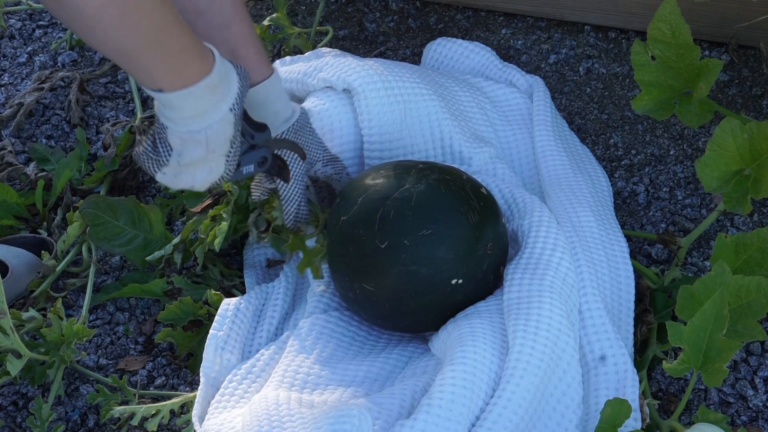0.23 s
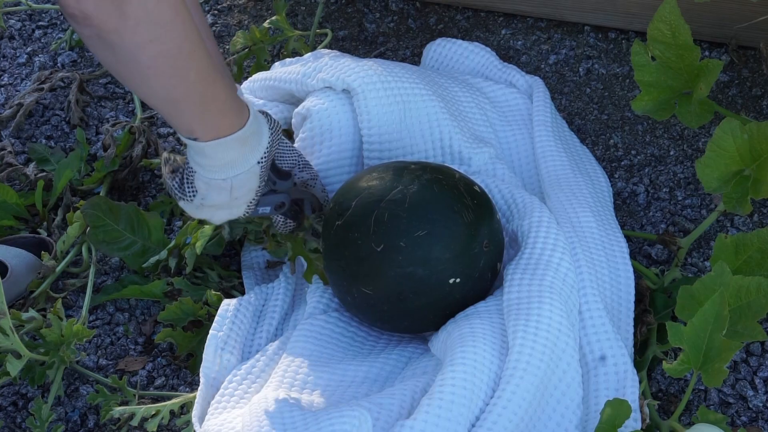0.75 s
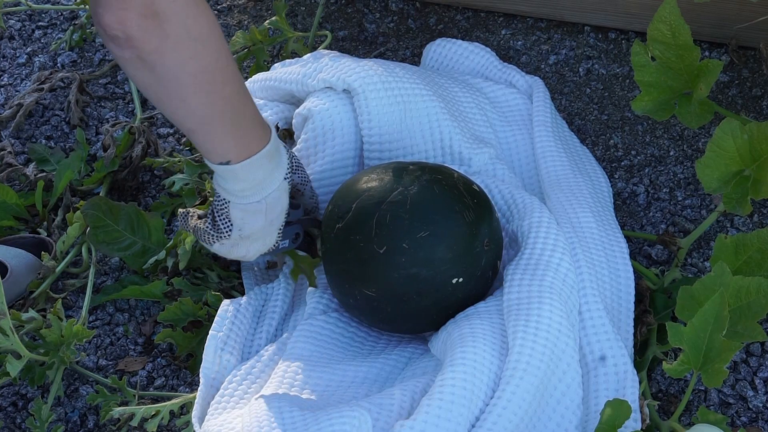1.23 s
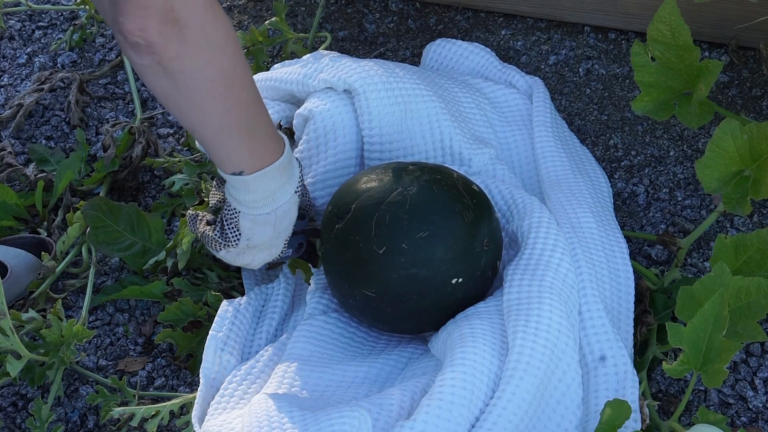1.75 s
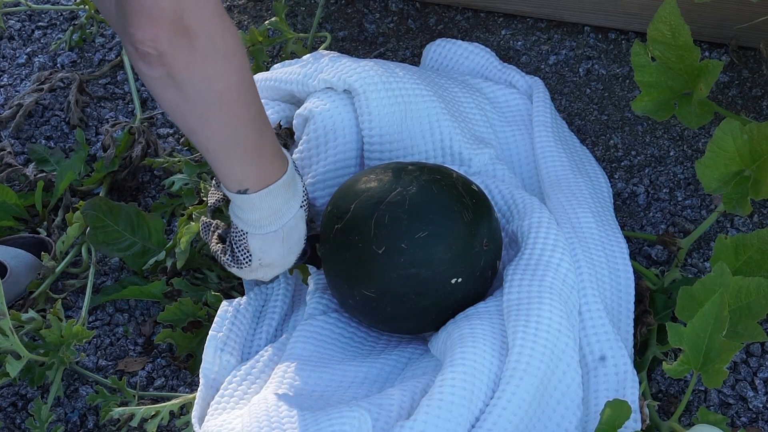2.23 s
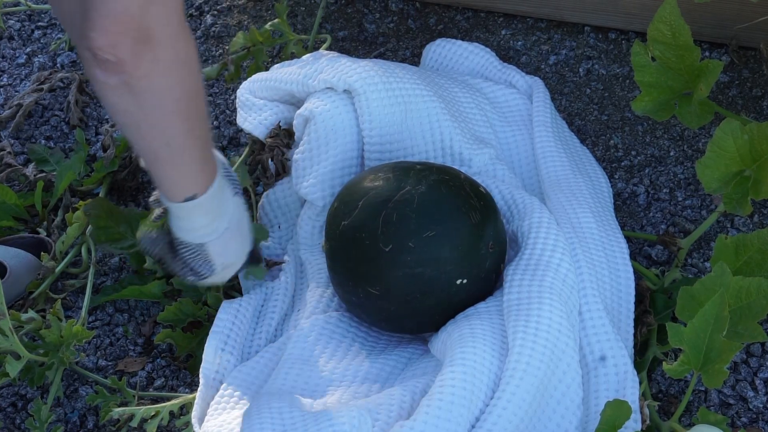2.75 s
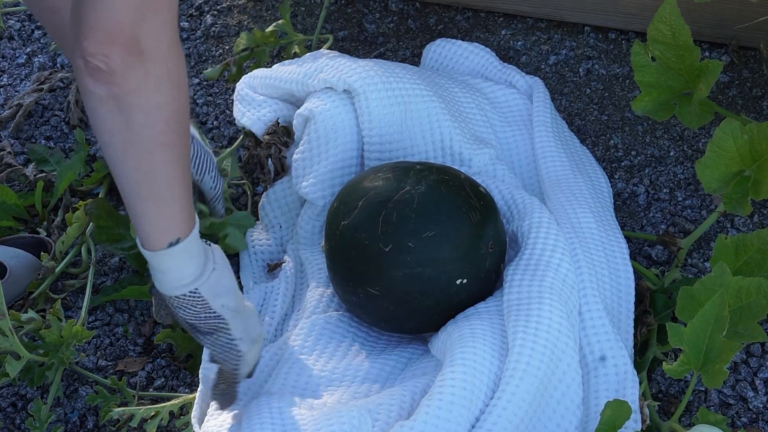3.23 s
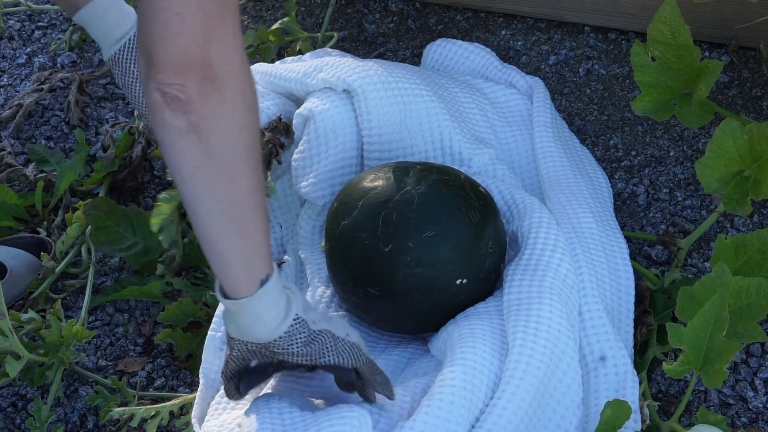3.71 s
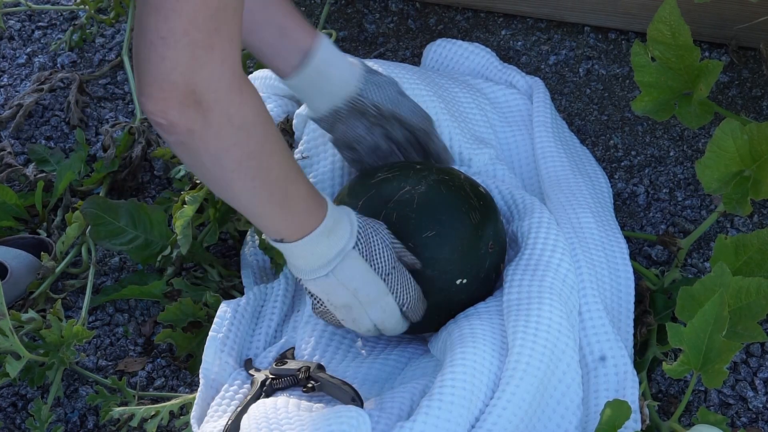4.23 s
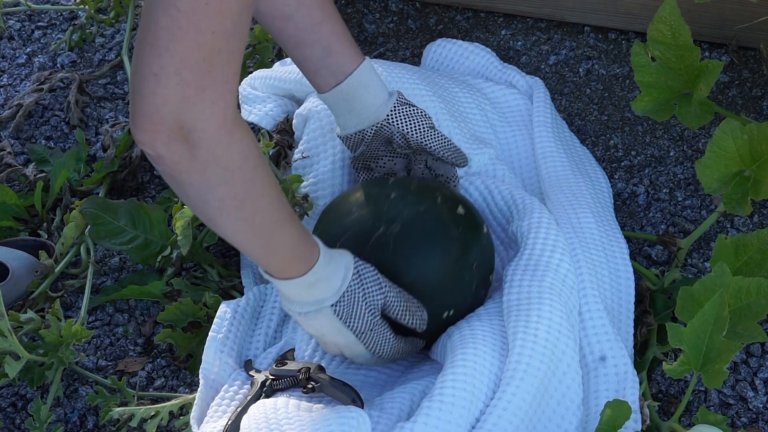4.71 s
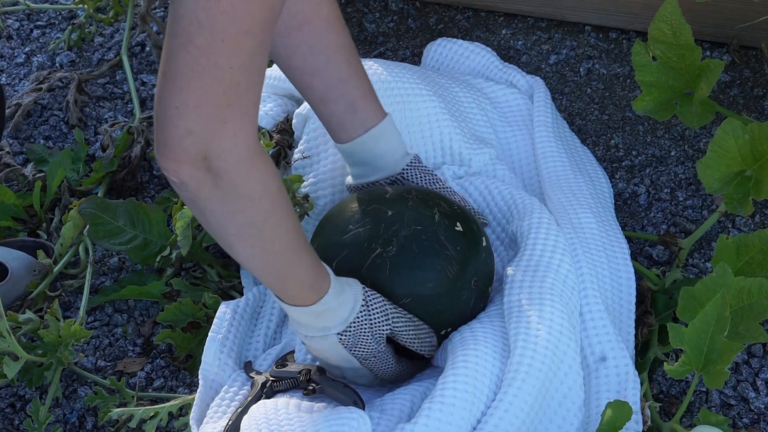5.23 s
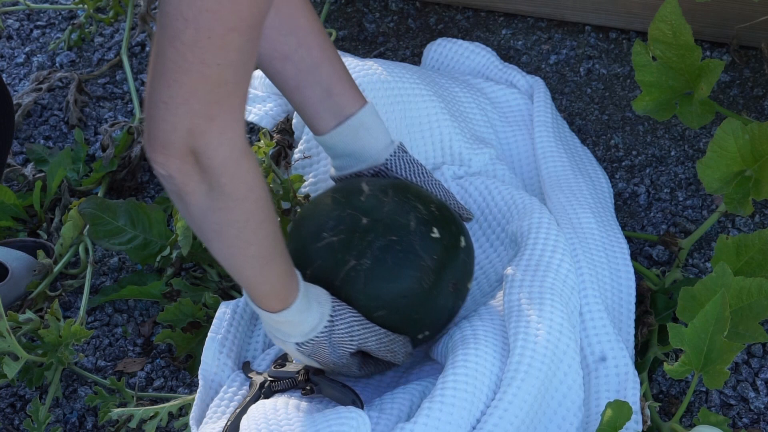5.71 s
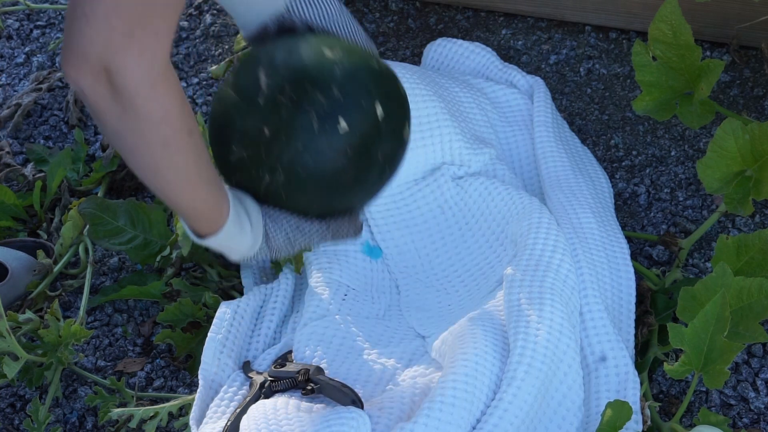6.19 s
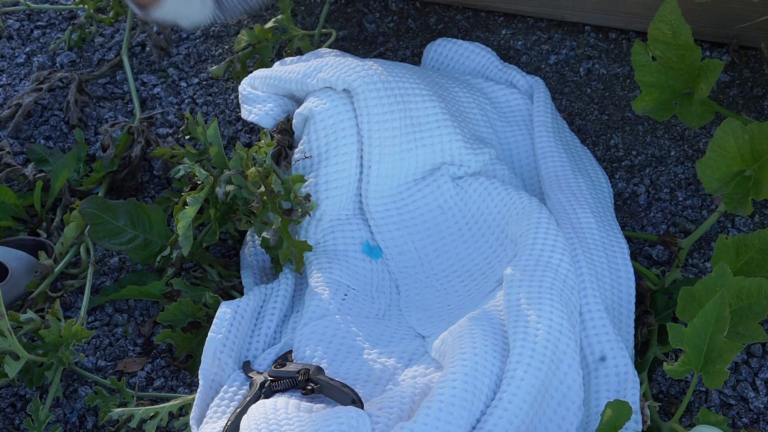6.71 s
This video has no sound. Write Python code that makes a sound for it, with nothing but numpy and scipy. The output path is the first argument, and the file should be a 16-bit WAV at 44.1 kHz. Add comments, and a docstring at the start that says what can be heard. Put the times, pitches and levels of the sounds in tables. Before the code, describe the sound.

A quiet open-air garden heard close up in stereo, with soft uneven hiss and a faint, narrow cricket whistle far away. From 0 to 1 s gloved hands rustle dry vine leaves, with many crisp snaps, strongest around 0.5 to 0.9 s, and faint dull knocks near 0.3 to 0.4 s. A katydid close by rasps in fast high pulses, about fourteen a second, from 0.1 to 1.1 s, 1.5 to 2.5 s, then from 3 s to the end. Rustling thins until about 2.5 s, when blades crunch through a stem in a brief, dense, splitting crackle. Leaves and cloth rustle again to 3.7 s; shears clack sharply at about 3.55 s and lightly at 3.9 s. A scuffing glove slap lands on the melon at 4.7 s, with duller pats at 5.2 and 5.4 s. Handling then fades to sparse crackles, leaving insects and air.

```python
"""A summer garden heard on a small two-port microphone: outdoor hiss in drifting patches, crickets far off
as a narrow noise whistle, and from the start gloved hands rustling dry vine leaves, in coloured snaps.
A katydid soon rasps close by on the left, ticks ringing its wing; stalks snap and a few dull knocks follow.
At about 2.5 s blades crunch through a stem, a dense crackle with ringing splits; then the shears clack,
and from about 4.7 s gloves slap a melon, whose rind rings in decaying modes under a scuff of noise."""
import sys
import numpy as np
from scipy import signal
from scipy.io import wavfile
from scipy.ndimage import uniform_filter1d

SR = 44100
rng = np.random.default_rng(int(sys.argv[2]) if len(sys.argv) > 2 else 0)


def to_wav(sig):
    """Store sig (one row per channel, or 1-D mono) as 16-bit WAV at the path in sys.argv[1].

    Samples outside -1..1 are clipped; the rate is SR.
    """
    pcm = np.clip(np.atleast_2d(sig), -1, 1) * 32767
    pcm = np.round(pcm).astype(np.int16)
    wavfile.write(sys.argv[1], SR, pcm.T)  # frames by channels


N = 306627  # samples


def amp(db):
    """Turns dB into an amplitude factor."""
    return 10 ** (np.asarray(db) / 20)


def evened(x):
    """Scales a signal to rms 1."""
    return x / np.sqrt(np.mean(x ** 2) + 1e-20)


def read(points, hz):
    """Reads a spectrum table on a log-frequency axis."""
    f, value = np.transpose(points)
    return np.interp(np.log(hz + 1), np.log(f + 1), value)


def follow(rows, t, column=1):
    """Reads a table column at times t, in straight lines between rows."""
    return np.interp(t, np.transpose(rows)[0], np.transpose(rows)[column])


def add(mix, s, sound):
    """Lays a sound into the mix at s seconds, cut off at the end."""
    part = mix[..., round(s * SR):][..., :sound.shape[-1]]
    part += sound[..., :part.shape[-1]]


def wander(size, count=N):
    """Slow chance of rms 1: noise averaged over size samples."""
    return evened(uniform_filter1d(rng.standard_normal(count), size))


def ring(x, hz, width):
    """One resonance of gain about 1 at its centre, width in Hz."""
    r = np.exp(-np.pi * width / SR)
    return 2 * signal.lfilter([1 - r], [1, -r * np.exp(2j * np.pi * hz / SR)], x).real


def colour(x, points):
    """Causal filter with the given dB spectrum (minimum phase)."""
    level = np.log(amp(read(points, abs(np.fft.fftfreq(2048, 1 / SR)))))
    spectrum = np.exp(level - 1j * signal.hilbert(level).imag)
    taps = np.fft.ifft(spectrum).real[:800]
    return signal.oaconvolve(x, taps[None], axes=1)[:, :x.shape[1]]


def ports(a, b, alike, lead=0):
    """Two ports share part of a sound; the left hears the shared part lead samples early."""
    alike = np.clip(alike, 0, 1)
    return np.array([np.roll(a, -lead), alike * a + np.sqrt(1 - alike ** 2) * b])


def pan(db):
    """Gains of the two ports for a left-right difference in dB."""
    return amp([[db / 2], [-db / 2]])


# Colour of the open air at the microphone. Each row: frequency in Hz, relative density in dB per Hz.
AIR_COLOUR = [(18, -58), (30, -22), (185, -28.5), (306, -20), (694, -11.5), (881, -7.5), (1120, -4),
              (1530, -6), (2160, -1.5), (2740, -2), (3660, 0), (8530, -8), (12300, -8.5), (15200, -19.5),
              (16500, -46)]
# How much of the air both ports share. Each row: frequency in Hz, likeness from 0 to 1.
AIR_LIKENESS = [(60, 0.14), (300, 0.4), (1200, 0.18), (2200, 0.049), (4000, 0.83), (9000, 0.48),
                (15000, .4)]
# Lean of the air between the ports. Each row: frequency in Hz, left-right difference in dB.
AIR_LEAN = [(60, 0), (180, 0), (550, 0), (1650, 3.5), (4970, 2), (15000, -5.5)]
# Swells of the low hiss. Each row: time in seconds, lift around 350 Hz in dB, lift around 900 Hz in dB.
LOW_SWELLS = [(0, 1.5, 1.5), (.7, 2, 2), (1.25, 7, 1), (1.6, 1.5, 1), (2.5, 1.5, 1.5), (3.3, 3, 2),
              (4.4, 1, 2), (5.3, 5, 3.5), (5.8, 0.5, 1.5), (6.4, 1.5, 1.5), (6.7, 4, 4), (6.95, 0, 8)]
AIR_DB = -46.5  # rms over both ports


def air():
    """Outdoor hiss: noise in drifting patches, reaching the left port first; its low part swells."""
    frames, hz = N // 256 + 5, np.fft.rfftfreq(1024, 1 / SR)
    a, b, c, d, patches = rng.standard_normal((frames, 513, 5)).T
    patches = uniform_filter1d(patches, size=12, axis=0)
    patches = evened(uniform_filter1d(patches, size=10, axis=1))

    alike = np.clip(read(AIR_LIKENESS, hz), 0, 1)[:, None]
    left, own_right = a + 1j * b, c + 1j * d
    late = np.exp(-2j * np.pi * hz * 3 / SR)[:, None]  # 3 samples
    z = np.array([left, alike * left * late + np.sqrt(1 - alike ** 2) * own_right])

    t, octave = np.arange(frames) * 256 / SR, np.log2(hz + 1)[:, None]
    swell_db = np.exp(-((octave - np.log2(350)) / 1.24) ** 2) * follow(LOW_SWELLS, t)
    swell_db += np.exp(-((octave - np.log2(900)) / 1.04) ** 2) * follow(LOW_SWELLS, t, column=2)
    z *= amp(read(AIR_COLOUR, hz)[:, None] + 1.2 * patches + swell_db)
    z *= amp(np.outer([.5, -.5], read(AIR_LEAN, hz)))[..., None]
    hiss = signal.istft(z, nperseg=1024, noverlap=768)[1][:, :N]
    return amp(AIR_DB) * evened(hiss)


# The far crickets' loudness at the microphone. Each row: time in seconds, level in dB.
CRICKET_LEVEL = [(0, -56), (.7, -54), (1.1, -59), (1.55, -55), (3.81, -54), (4.1, -60), (5.9, -58.5),
                 (6.5, -73), (6.95, -56)]


def crickets():
    """Many far crickets blur into one narrow, broken whistle: noise through two like resonances."""
    noise = rng.standard_normal((2, N))
    whistle = ring(ring(noise, 2199, 160), 2199, 160)
    whistle *= amp(2.0 * wander(size=1500))
    level = amp(follow(CRICKET_LEVEL, np.arange(N) / SR))
    return level * evened(whistle) * pan(3)


def crackle(points, per_s, spread_db, clump_db, t60, count=N):
    """Tiny snaps, each in its own pitch range and with a short rough tail, in clumps, a few large."""
    together, out = wander(size=250, count=count), np.zeros((2, count))
    t = np.arange(600) / SR
    for hz in np.geomspace(700, 14000, num=10):
        size = amp(spread_db * np.minimum(rng.exponential(1, (2, count)), 4))
        size *= rng.choice([-1., 1.], (2, count))
        tail = rng.standard_normal(len(t)) * amp(-60 * t / t60)
        tail[0] = 3.4  # the snap itself
        tail /= np.linalg.norm(tail)
        onsets = size * (rng.random((2, count)) < per_s / SR)
        snaps = signal.oaconvolve(onsets, tail[None], axes=1)[:, :count]
        a, b = snaps + 0.12 * rng.standard_normal((2, count))
        clumps = amp(clump_db * (together + 1.07 * wander(size=400, count=count)))
        out += ring(ring(ports(a, b, 0.68) * clumps, hz, 0.6 * hz), hz, 0.65 * hz)
    return evened(colour(out, points))


# Colour of dry leaves close to the microphone. Each row: frequency in Hz, relative filter gain in dB.
LEAF_COLOUR = [(180, -70), (300, -21.5), (900, -17), (1120, 0), (1410, -5.5), (2140, -3), (2700, -2.5),
               (5250, -4), (12300, -12), (16000, -22.5)]
# Hands moving through leaves and cloth. Each row: time in seconds, level in dB,
# brightness in dB per octave, pivoting at 5 kHz.
HAND_MOVES = [(0, -48.5, 5.5), (.14, -43.5, 1.5), (.21, -51.5, 9), (.3, -46, 2), (.45, -47.5, 3.5),
              (.56, -40.5, 2.5), (.63, -45, 7), (.74, -39.5, 4), (.84, -40, 2), (.96, -45.5, 3),
              (1.1, -50.5, 1), (1.2, -51, 0), (1.33, -45, 2.5), (1.41, -54, -0.5), (1.7, -51, 1),
              (2.2, -55, 1.5), (2.47, -51, -1.5), (2.56, -43, 3.5), (2.72, -43, 1), (2.87, -44, 2),
              (3.06, -49.5, -0.5), (3.25, -44.5, 2.5), (3.35, -48.5, 0.5), (3.5, -48.5, -0.5),
              (3.6, -43.5, 4), (3.84, -54, 0.5), (3.91, -48.5, 4), (4.05, -57, -3), (4.28, -51.5, 1.5),
              (4.37, -52, -1.5), (4.6, -45.5, -0.5), (4.85, -56, -1), (5.2, -52, 2.5), (5.5, -58.5, 2),
              (5.75, -59, 4), (6.1, -73, 6), (6.4, -57, 2), (6.95, -55, 4)]


def rustle():
    """Leaves and cloth under the hands: fine crackle, its colour tilted by brightness."""
    snaps = crackle(LEAF_COLOUR, per_s=200, spread_db=4.5, clump_db=2.0, t60=.011)
    hz, t, z = signal.stft(snaps, SR, nperseg=256)
    octaves = np.log2(np.maximum(hz, 400) / 5000)[:, None]
    z *= amp(follow(HAND_MOVES, t) + follow(HAND_MOVES, t, column=2) * octaves)
    return signal.istft(z, SR, nperseg=256)[1][:, :N]


def swarm(t60, grit_db, blow_db):
    """A blow just after the first touch, within a dying swarm of smaller breaks."""
    t = np.arange(3500) / SR
    decay = np.minimum(t / .001, 1) * amp(-60 * t / max(t60, .005))
    grit = np.tanh(wander(size=20, count=len(t)))
    a, b = rng.standard_normal((2, len(t))) * amp(grit_db * grit)
    out = ports(a, b, 0.52) * decay
    out *= np.sqrt(2) * np.linalg.norm(decay) / np.linalg.norm(out)
    out[:, 50] += amp(blow_db)
    return out


def hit(db, bass_db, treble_db, t60, pan_db, hz, ring_db, grit_db, blow_db):
    """A break of the given colour; the piece that gives way rings briefly."""
    drive = swarm(t60, grit_db, blow_db)
    shape = [(150, bass_db - 30), (500, bass_db - 10), (1300, bass_db), (2300, 0.51 * bass_db),
             (3300, 0.12 * bass_db), (6500, 0), (11000, treble_db), (16000, treble_db - 8.5)]
    ringing = ring(ring(drive, hz, 0.12 * hz), hz, 0.18 * hz)
    return amp(db) * (colour(drive, shape) + amp(ring_db) * ringing) * pan(pan_db)


# The loudest snaps of dry leaves and stalks. Each row: start in seconds, level in dB,
# bass at 1.3 kHz in dB, treble at 11 kHz in dB (both against 6.5 kHz), ring in Hz.
SNAPS = [(0.0279, -27, -21, 3, 6850), (0.0522, -25.5, -32, 1, 6000), (0.0974, -27.5, -5, -10, 4530),
         (.113, -26, -23, -1, 3690), (0.22, -29.5, -22, .5, 9000), (0.257, -27, -20, -2, 3250),
         (.3704, -24, -17, -1, 8760), (0.4103, -27, -27, -4, 7800), (.5013, -28, -28, -6, 7150),
         (.522, -20, -19, 0, 4940), (0.5393, -26, -22, -7, 3800), (0.5433, -26, -7, -5, 8700),
         (0.5619, -20, -30, -3, 7300), (0.5928, -29, -15, -4, 2230), (.627, -21.5, -30, -5, 9450),
         (0.692, -24, -14, -11, 7550), (0.7232, -26.5, -20, -2, 6400), (.7866, -29, -20, -13, 6900),
         (.818, -24, -27, -8, 8500), (.824, -26, -23, -16, 5060), (.8394, -29, -28, -17, 6400),
         (0.845, -25.5, -30, -5, 6860), (.894, -27.5, -24, -15, 5440), (.9378, -28, -23, -12, 8300),
         (.9524, -28, -19, -10, 2420), (1.1692, -33.5, -13, 5, 2270), (1.2316, -30, -20, -20, 3450),
         (1.254, -29, -10, -3, 2460), (1.275, -32, -3, -5, 3830), (1.5227, -31.5, -15, -5, 6770),
         (1.5858, -32.5, -24, 1, 3730), (2.2357, -32, -21, 0, 2080), (2.5631, -24.5, -5, 3.5, 9500),
         (2.6008, -36, 7, 4, 2200), (2.6468, -36, -14, 6, 9150), (2.6885, -23, -7.5, 1.5, 5700),
         (2.8185, -27.5, -17, -27, 3230), (2.886, -25, -25, 0, 4360), (2.939, -28, -20, -15, 4400),
         (3.043, -24, -12, -10, 1980), (3.1853, -21.5, -20, -30, 3950), (3.2241, -29, -15, -15, 3490),
         (3.2636, -32, -9, 6, 10700), (3.341, -32, -20, 4, 9000), (3.493, -29, -22, -23, 3320),
         (4.363, -29.5, 3.5, -30, 3050), (4.4057, -34, 0, -8, 2220), (4.491, -29.5, -30, -12, 4530),
         (4.529, -31, -16, -19, 3780), (4.5404, -31, -23, -6, 3760), (4.968, -34, 5, -23, 3990),
         (5.1805, -28.5, -13, -15, 1920), (5.2212, -31, -22, -12, 5800), (5.233, -30, -22, -14, 5150),
         (5.2758, -32, -1, -15, 3240), (5.623, -32.5, -18, -12, 4950), (6.4595, -30, -13, -1, 4230)]
SNAP_T60, SNAP_PAN_DB = 0.023, 0  # s, left-right dB
SNAP_RING_DB, RING_DB_PER_OCTAVE = 1.5, -3.5  # at 5 kHz; thick stalks ring lower and stronger


def cracks():
    """Dry leaves and stalks snap: short noise bursts, each with a ring of its own pitch."""
    out = np.zeros((2, N))
    for s, db, bass_db, treble_db, hz in SNAPS:
        ring_db = SNAP_RING_DB + RING_DB_PER_OCTAVE * np.log2(hz / 5000)
        add(out, s, hit(db, bass_db, treble_db, SNAP_T60, SNAP_PAN_DB, hz, ring_db, grit_db=3.0, blow_db=10))
    return out


# Two pulls and a slide back of the wings.
# Each row: peak in seconds, half width in seconds (to 1/e), relative level in dB.
WING_STROKE = [(.012, 0.0043, -4), (.03, .005, -3), (.046, 0.0047, -13.5)]
# Resonances of the wing. Each row: frequency in Hz, width in Hz, relative level in dB.
WING_MODES = [(10400, 150, -7), (10770, 160, -7.5), (11230, 250, -8), (11600, 86, 0.5), (11940, 160, -7.5),
              (12290, 165, 1.5), (12750, 130, 0), (13080, 400, -8), (14100, 500, -20)]
# Three phrases, drifting a little around 14 strokes a second. Each row: time in seconds, strokes done.
STROKE_COUNTS = [
    [(.062, 0), (.488, 6), (1.047, 14)],
    [(1.47, 0), (1.803, 5), (2.076, 9), (2.427, 14)],
    [(3.002, 0), (3.401, 6), (3.878, 13), (4.371, 20), (4.982, 29), (5.404, 35), (5.817, 41), (6.63, 53),
     (6.905, 57)],
]
# Effort of the katydid. Each row: time in seconds, drive in dB before the wing rings.
KATYDID_EFFORT = [(.06, -47.5), (.49, -47), (.66, -55), (1.05, -49), (1.47, -55), (1.67, -49),
                  (2.08, -45.5), (2.43, -50.5), (3.0, -54), (3.3, -47), (3.47, -50), (3.68, -45),
                  (4.27, -48.5), (4.55, -45), (5.2, -46), (5.65, -49.5), (5.85, -46.5), (6.4, -49),
                  (6.63, -44), (6.91, -47.5)]
# The wings stay in fading touch between the pulls.
CONTACT_DB, CONTACT_DB_PER_S, STROKE_S = -6.5, -100, .066


def katydid(teeth_hz=590, jitter=0.19, blur=0.46, sway_db=0.5):
    """Close by on the left, a scraper ticks over file teeth and rings the wing; foliage blurs it."""
    t, push = np.arange(0, STROKE_S, 1 / SR), np.zeros(N)
    pulls = sum(amp(db) * np.exp(-((t - s) / half) ** 2) for s, half, db in WING_STROKE)
    contact = amp(CONTACT_DB + CONTACT_DB_PER_S * t)
    shape = (pulls + contact) * signal.windows.tukey(len(t), .3)
    for phrase in STROKE_COUNTS:
        when, done = np.transpose(phrase)
        for s in np.interp(np.arange(done[-1] + 1), done, when):
            add(push, s, amp(follow(KATYDID_EFFORT, s) + 1.2 * rng.standard_normal()) * shape)

    teeth_passed = np.cumsum(teeth_hz * (1 + jitter * wander(size=300))) / SR
    at_tooth = np.diff(np.floor(teeth_passed), prepend=0) > 0
    ticks = evened(at_tooth * amp(1.7 * rng.standard_normal(N)))
    direct, scattered = ticks + blur * rng.standard_normal(N), rng.standard_normal(N)
    # half of the push, in dB, drives the wing and half shapes its sound
    drive = ports(evened(direct), scattered, 0.82, lead=3) * np.sqrt(push)

    wing = np.zeros((2, N))
    for k, (hz, width, db) in enumerate(WING_MODES):  # the wing angle favours now one mode, now another
        sway = amp(db + sway_db * wander(size=4000))
        wing += (-1) ** k * sway * ring(ring(drive, hz, width), hz, 900)
    return amp(15.5) * wing * np.sqrt(push) * pan(.6)


# Dull knocks carried to the microphone. Each row: start in seconds, level in dB, frequency in Hz.
KNOCKS = [(0.278, -60, 150), (.407, -56, 110), (.433, -61, 130)]


def bumps():
    """One slow push and rebound each: a cycle and a half of a sine under a smooth window."""
    out = np.zeros(N)
    for s, db, hz in KNOCKS:
        turns = np.arange(0, 1.5, hz / SR)
        add(out, s, amp(db) * np.sin(2 * np.pi * turns) * np.hanning(len(turns)))
    return out


# Colour of the stem under the blades. Each row: frequency in Hz, relative filter gain in dB.
STEM_COLOUR = [(200, -40), (600, -16), (1150, -12), (2000, -8), (3000, -0.5), (6000, -6), (9000, -9),
               (13000, -12), (16000, -16)]
# Blades bite, crunch through the stem, let go.
CUT_AT_S, CUT_DB, BITE_S, CRUNCH_S, BITE_DB, LET_GO_DB_PER_S = 2.49, -35, 0.024, 0.021, -6, -500


def cut():
    """Fibres part in a dense crunch that swells with the bite, holds, then falls away."""
    t = np.arange(SR // 8) / SR
    level_db = CUT_DB + BITE_DB * np.maximum(1 - t / BITE_S, 0)
    level_db += LET_GO_DB_PER_S * np.maximum(t - BITE_S - CRUNCH_S, 0)
    crunch = crackle(STEM_COLOUR, per_s=700, spread_db=1.5, clump_db=1.0, t60=0.0054, count=len(t))
    return crunch * amp(level_db)


# The stem splits under the blade. Each row: start in seconds, level in dB, ring in Hz, ring level in dB.
STEM_SPLITS = [(2.4915, -28, 2050, 12), (2.5017, -23, 3020, 2), (2.5065, -27.5, 2980, 10),
               (2.512, -28, 3190, 1), (2.5322, -28, 5850, -8)]
SPLIT_BASS_DB, SPLIT_TREBLE_DB, SPLIT_T60, SPLIT_PAN_DB = -8, -9, .04, -1.5  # T60 in s


def splits():
    """The stem splits: rough bursts a little to the right, each ringing at its own pitch."""
    out = np.zeros((2, N))
    for s, db, hz, ring_db in STEM_SPLITS:
        add(out, s, hit(db, SPLIT_BASS_DB, SPLIT_TREBLE_DB, SPLIT_T60, SPLIT_PAN_DB, hz, ring_db,
                        grit_db=8.0, blow_db=13))
    return out


# The shears clack. Each row: start in seconds, level in dB, treble at 11 kHz against 6.5 kHz in dB.
CLACKS = [(3.4027, -31, 2), (3.405, -28, 10), (3.5433, -37, 3), (3.5597, -17, 4), (3.583, -27.5, -4),
          (3.881, -28, -6), (3.9025, -41, -8)]
SHEARS_BASS_DB, SHEARS_T60, SHEARS_HZ, SHEARS_RING_DB = -27, 0.044, 11000, -4  # T60 in s


def shears():
    """The shears clack: thin, bright bursts with one high ring, midway between the ports."""
    out = np.zeros((2, N))
    for s, db, treble_db in CLACKS:
        add(out, s, hit(db, SHEARS_BASS_DB, treble_db, SHEARS_T60, 0, SHEARS_HZ, SHEARS_RING_DB,
                        grit_db=4.0, blow_db=7))
    return out


# Modes of the melon rind. Each row: frequency in Hz, relative level in dB, 60 dB decay in seconds.
RIND_MODES = [(350, -37, 0.015), (555, -12, 0.038), (1100, -7, 0.038), (1335, 3, 0.012), (1770, 3, 0.0094),
              (2630, -0.5, 0.015), (3570, -8, 0.019), (5170, 8.5, 0.011), (6540, -15, .006)]
# Colour of glove on rind. Each row: frequency in Hz, filter gain in dB.
SCUFF_COLOUR = [(200, -28), (600, -14), (1300, 1), (2600, 5.5), (5000, -3.5), (9000, -6), (16000, -11)]


def pat(db, low_hz, top_hz, scuff_db, pan_db):
    """The blow rings the rind; where and how softly it lands sets which modes speak; the glove scuffs on."""
    t = np.arange(3500) / SR
    reach = [(0.083 * low_hz, -45), (0.84 * low_hz, -14), (low_hz, 0),
             (top_hz, 0), (2.0 * top_hz, -20), (3 * top_hz, -40)]
    modes = np.zeros(len(t))
    for hz, mode_db, t60 in RIND_MODES:
        pitch = hz * rng.uniform(0.96, 1.04)
        modes += amp(mode_db - 60 * t / t60) * np.sin(2 * np.pi * pitch * t)
    scuff = amp(scuff_db) * colour(swarm(0.058, grit_db=5.0, blow_db=-20), SCUFF_COLOUR)
    return (amp(db) * colour(modes[None], reach) + scuff) * pan(pan_db)


# Gloves slap the melon. Each row: start in seconds, level in dB, lowest mode reached in Hz,
# highest mode reached in Hz, scuff level in dB, left-right difference in dB.
MELON_SLAPS = [(4.6685, -34.5, 360, 5950, -24.5, 1.5), (5.1813, -38, 560, 1900, -43, 3),
               (5.402, -45, 900, 1500, -39, -5), (5.4192, -31.5, 830, 3180, -42, 2.5)]


def pats():
    """Gloved slaps on the melon, each reaching its own range of rind modes."""
    out = np.zeros((2, N))
    for s, *row in MELON_SLAPS:
        add(out, s, pat(*row))
    return out


def scene():
    """All sources of the garden summed at the two ports."""
    mix = air() + crickets() + rustle() + cracks() + katydid() + bumps()
    add(mix, CUT_AT_S, cut())
    return mix + splits() + shears() + pats()


EDGE_HZ = 15950


def record(dry):
    """The band limit: a steep low-pass at EDGE_HZ."""
    taps = signal.firwin(511, EDGE_HZ, window=("kaiser", 9), fs=SR)
    return signal.oaconvolve(dry, taps[None], "same")


dry = scene()
out = record(dry)
to_wav(out)
```